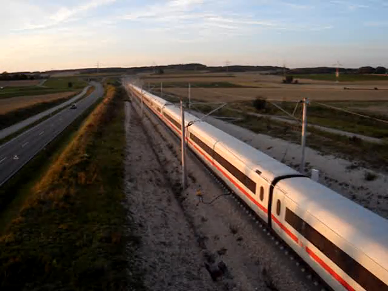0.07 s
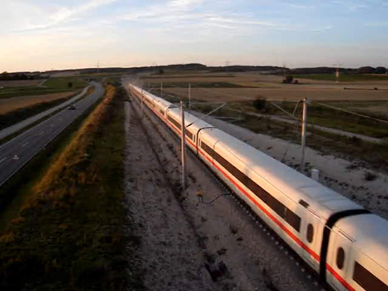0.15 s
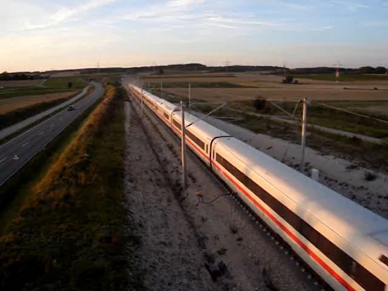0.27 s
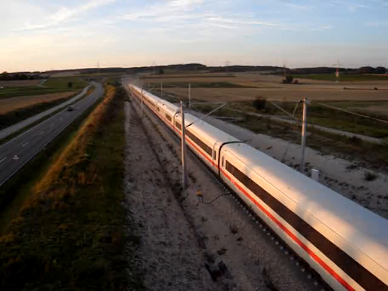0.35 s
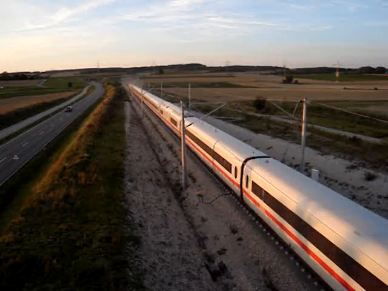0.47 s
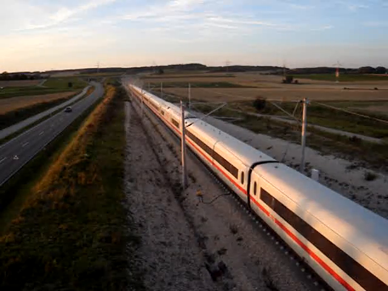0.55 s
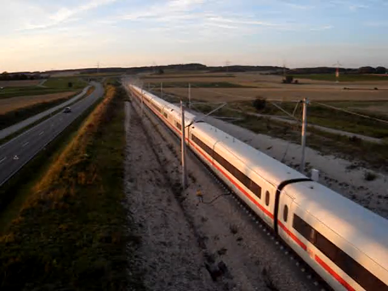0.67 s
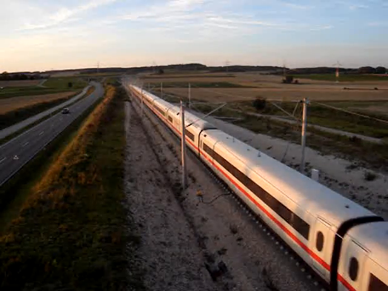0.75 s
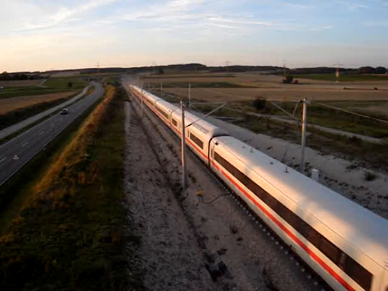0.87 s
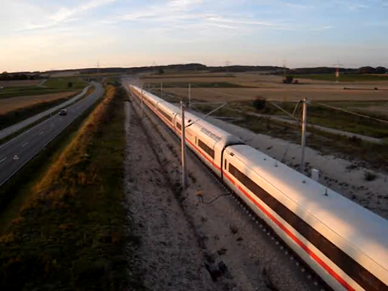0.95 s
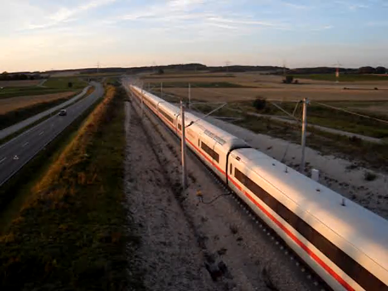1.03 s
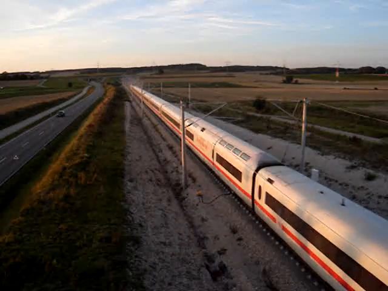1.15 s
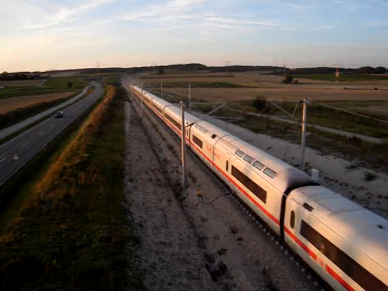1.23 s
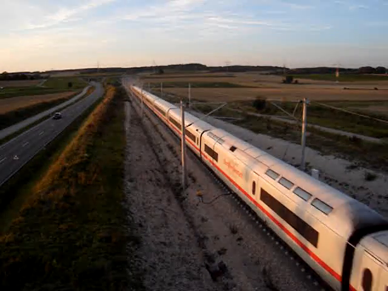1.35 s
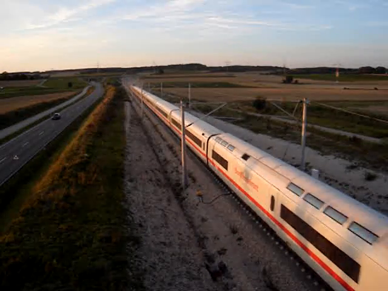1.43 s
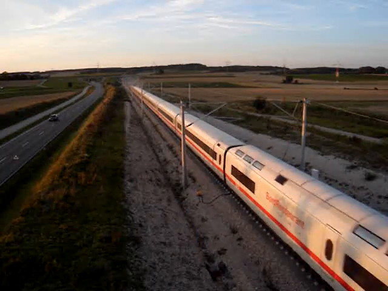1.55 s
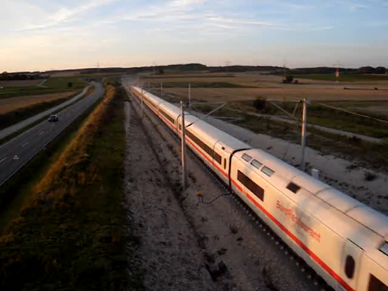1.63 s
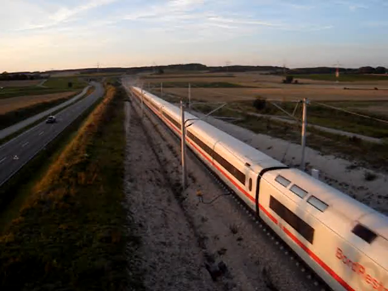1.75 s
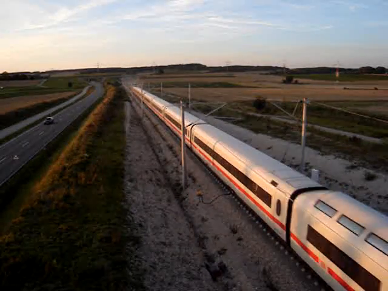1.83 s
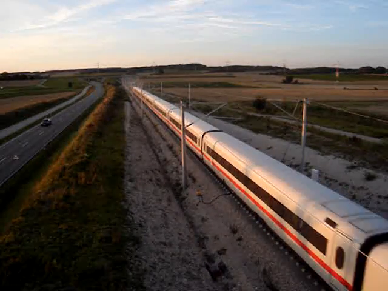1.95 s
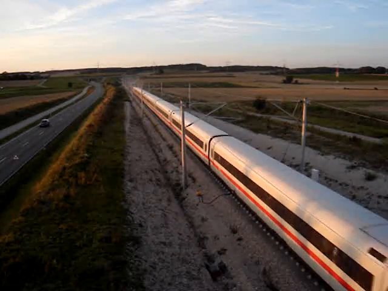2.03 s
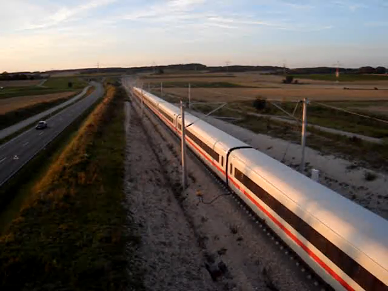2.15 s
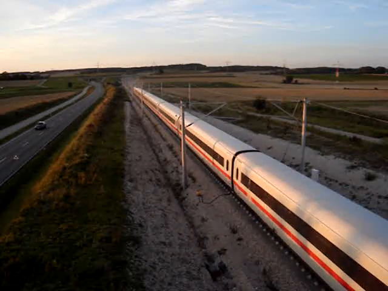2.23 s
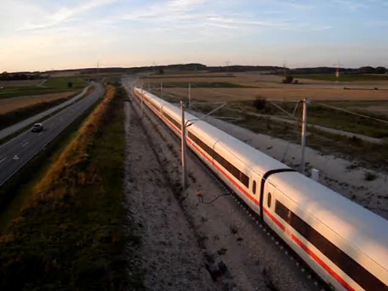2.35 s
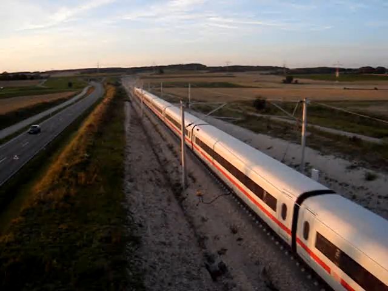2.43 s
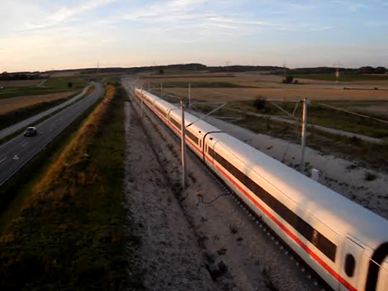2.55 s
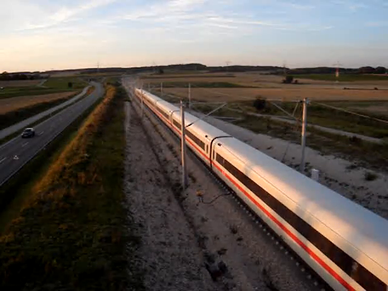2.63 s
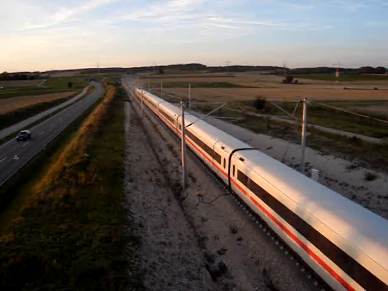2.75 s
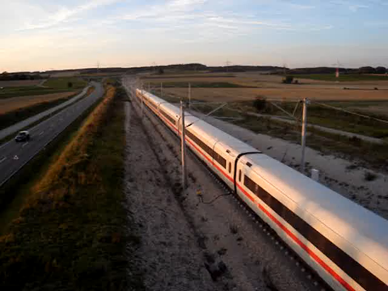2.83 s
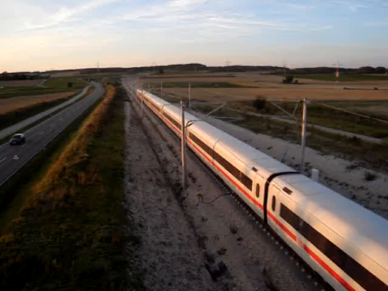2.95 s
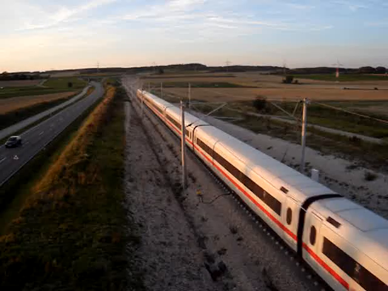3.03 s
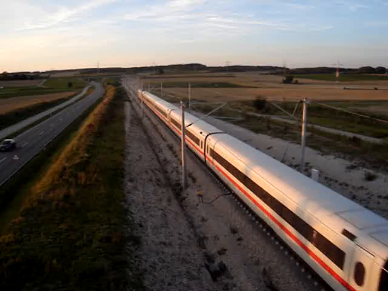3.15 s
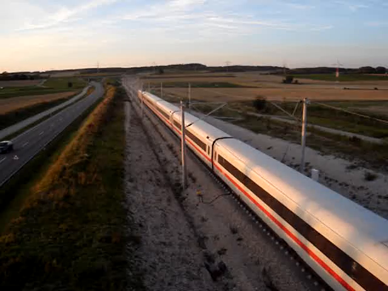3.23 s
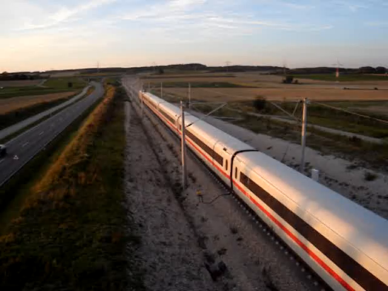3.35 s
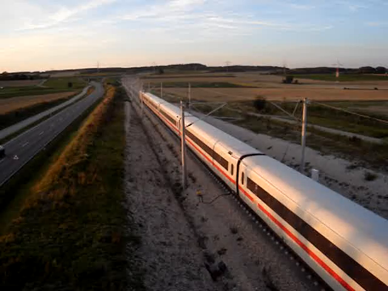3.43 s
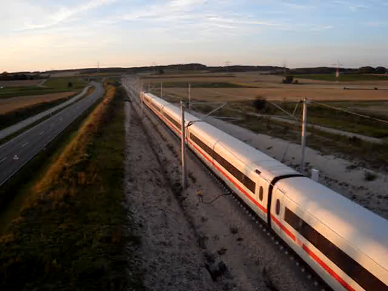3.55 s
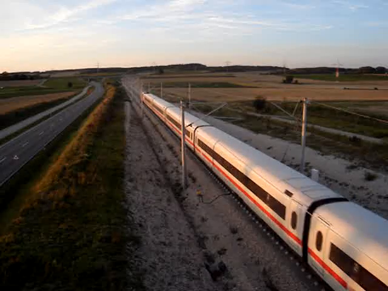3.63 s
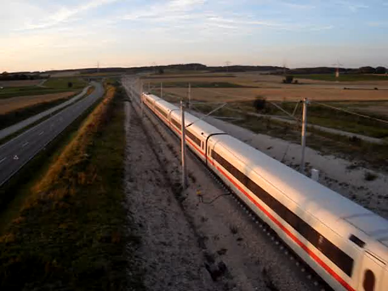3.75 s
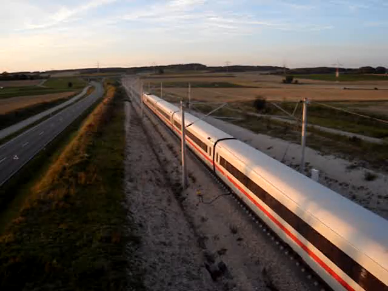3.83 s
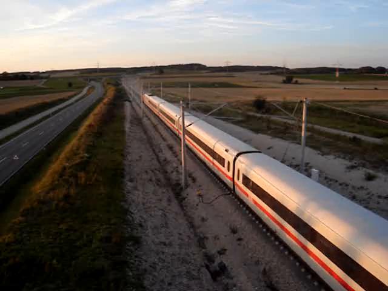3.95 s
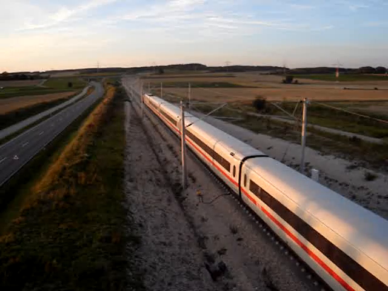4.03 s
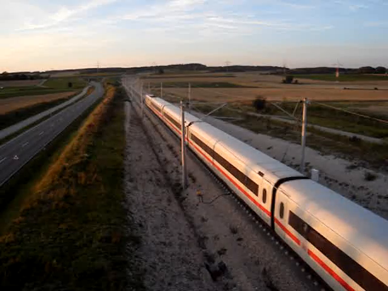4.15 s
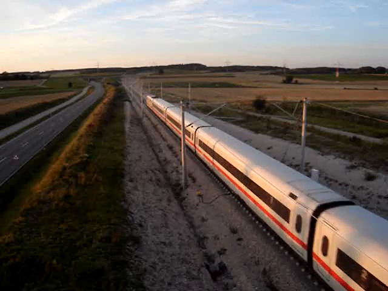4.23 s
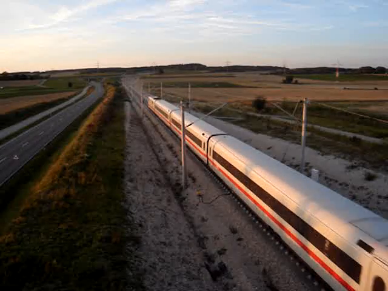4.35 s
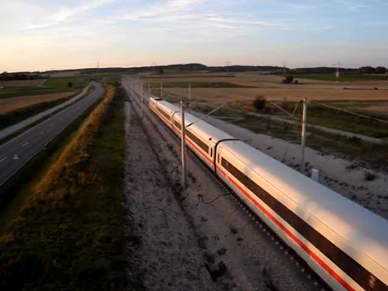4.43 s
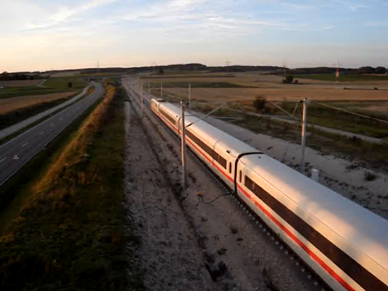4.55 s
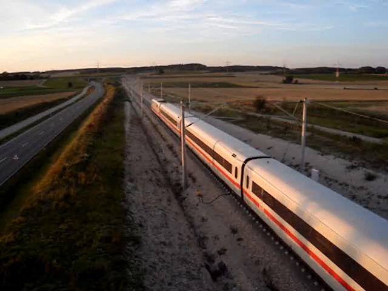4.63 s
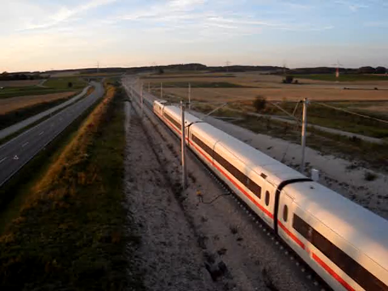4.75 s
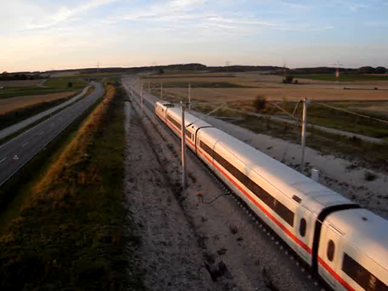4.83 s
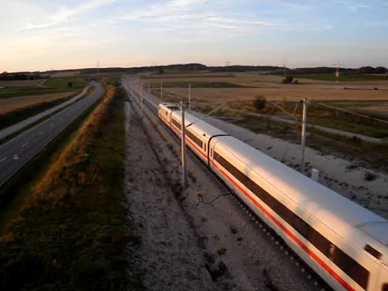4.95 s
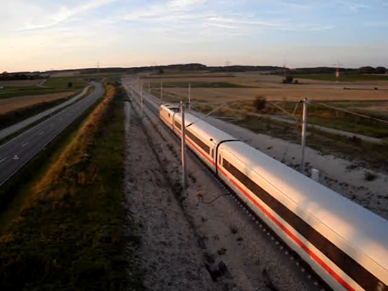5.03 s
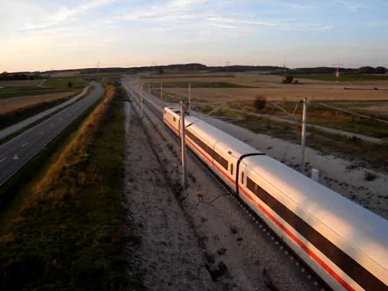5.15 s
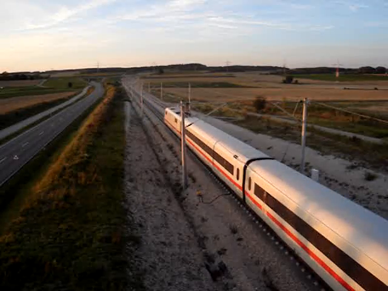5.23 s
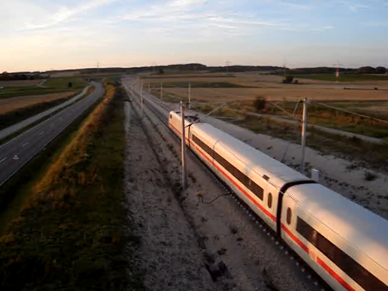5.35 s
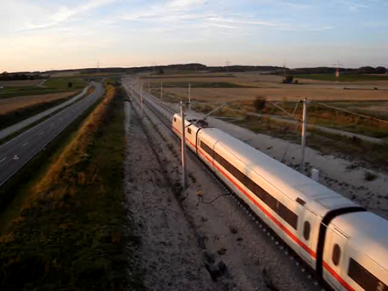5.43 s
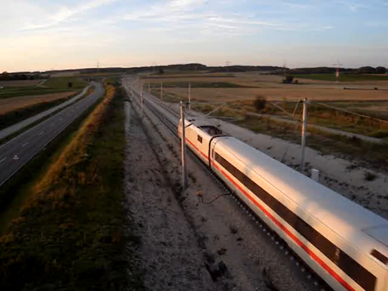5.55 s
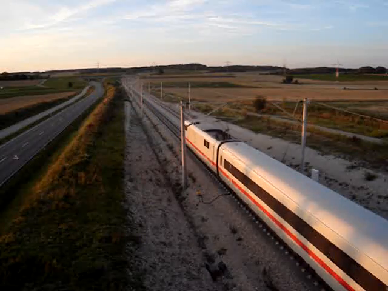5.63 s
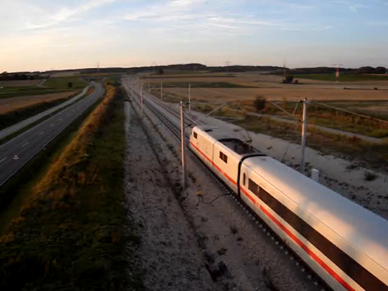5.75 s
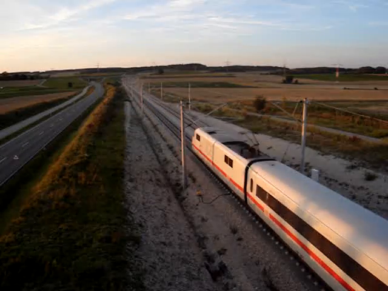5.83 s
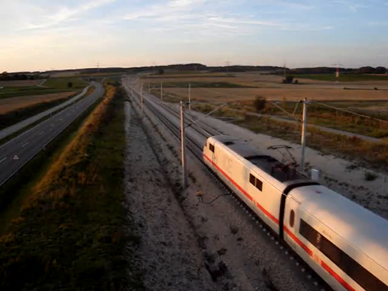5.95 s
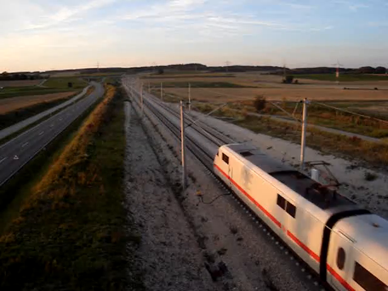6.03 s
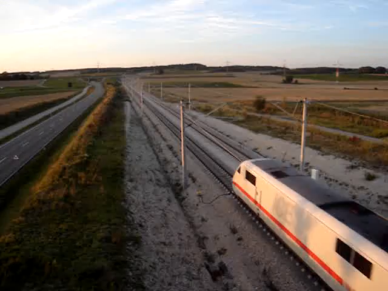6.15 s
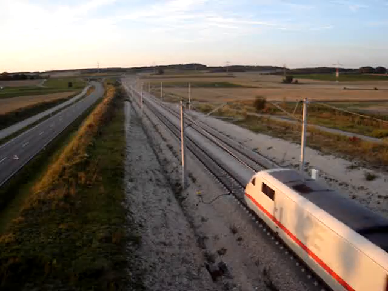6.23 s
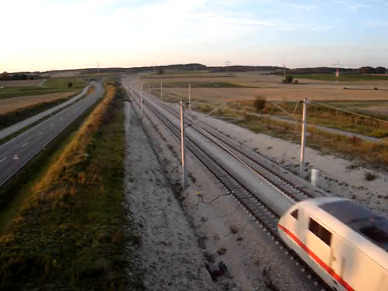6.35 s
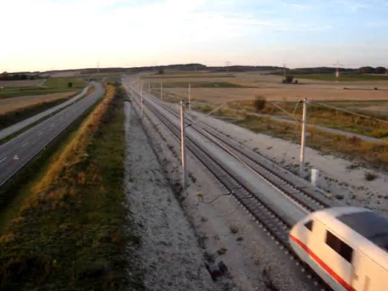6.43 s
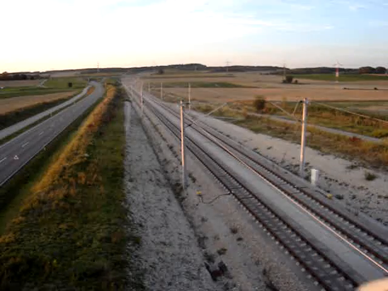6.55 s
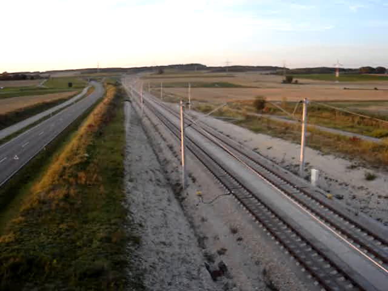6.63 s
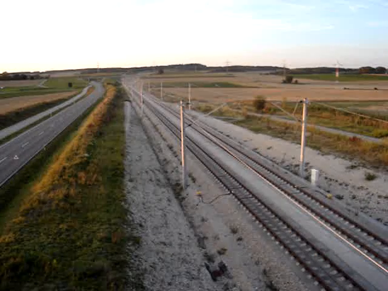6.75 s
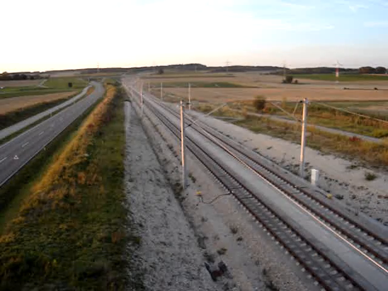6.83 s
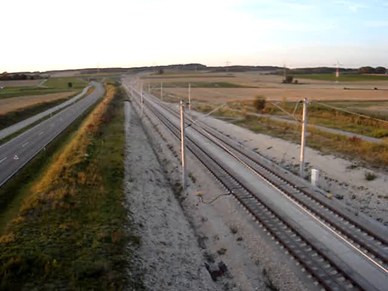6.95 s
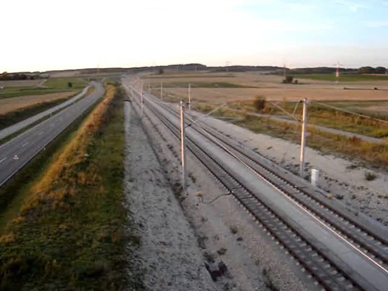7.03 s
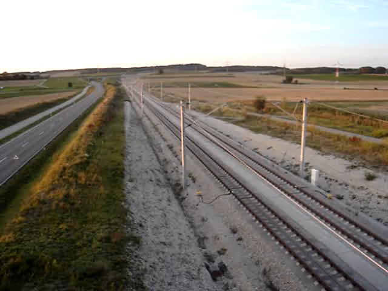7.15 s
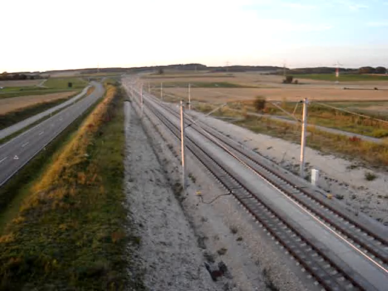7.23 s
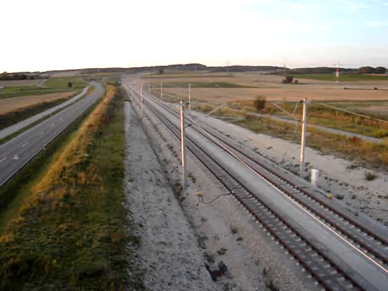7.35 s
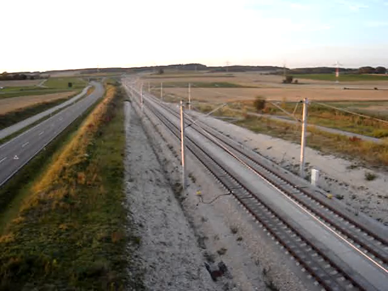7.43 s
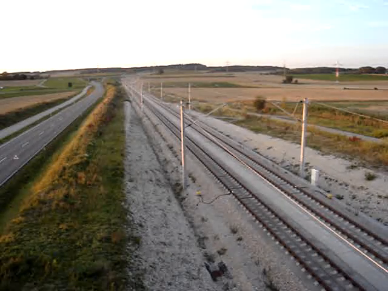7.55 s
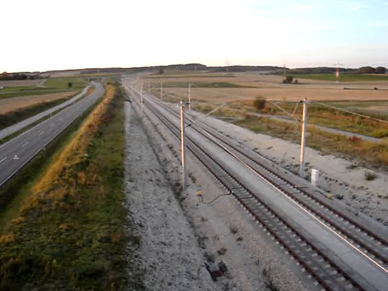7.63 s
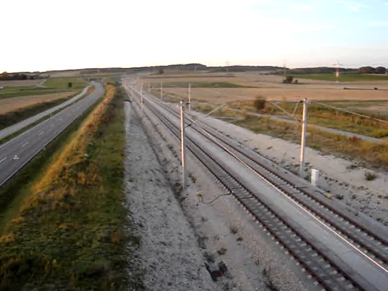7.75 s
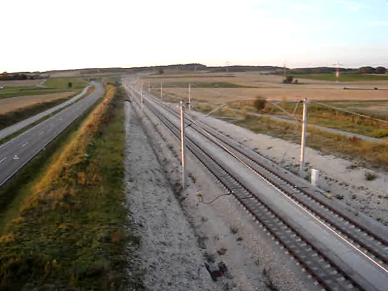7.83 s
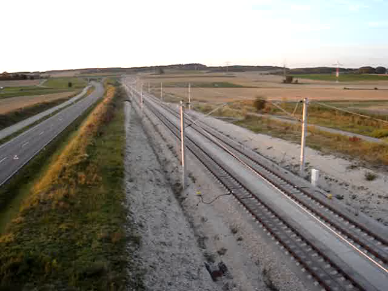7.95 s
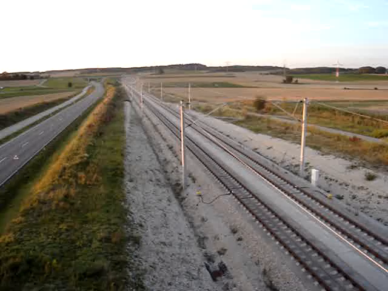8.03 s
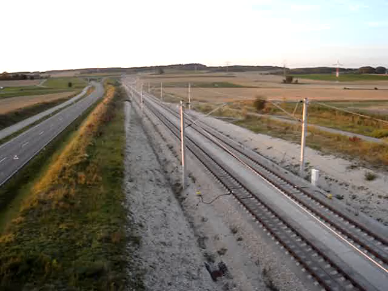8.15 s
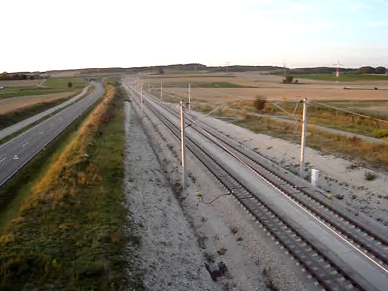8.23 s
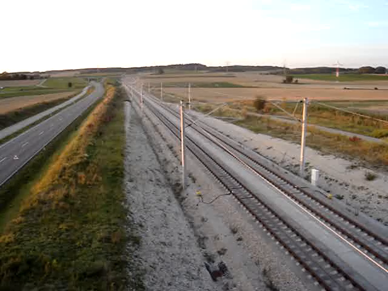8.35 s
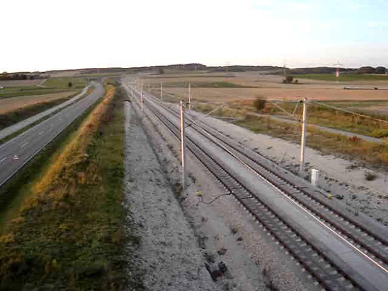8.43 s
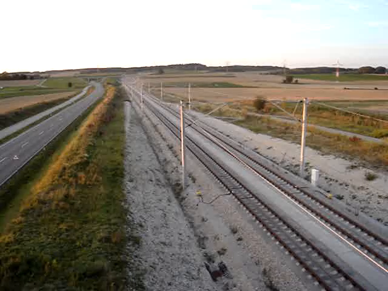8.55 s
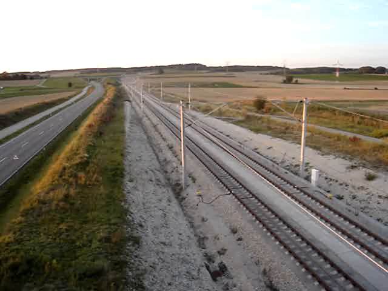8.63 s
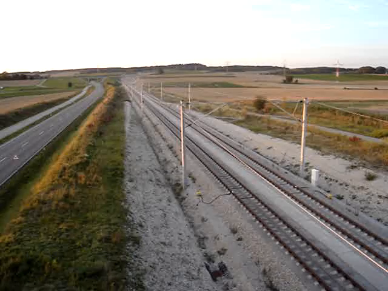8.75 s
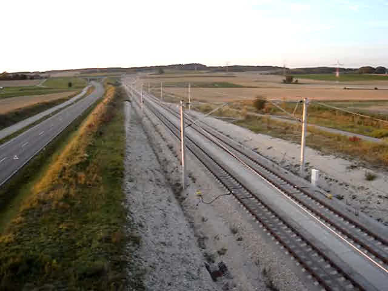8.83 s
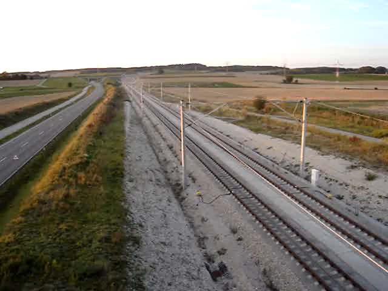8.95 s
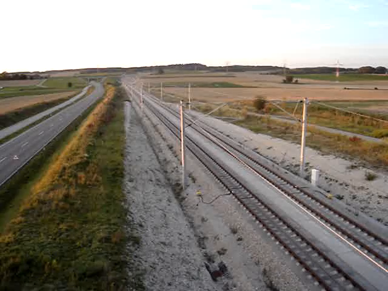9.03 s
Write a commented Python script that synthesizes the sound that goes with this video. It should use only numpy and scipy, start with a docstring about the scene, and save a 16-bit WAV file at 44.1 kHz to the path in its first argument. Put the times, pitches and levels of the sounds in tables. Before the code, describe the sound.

A high-speed train rushes past close by with pulsing wheel roar, hiss and brief squeals, then drops abruptly to a distant rumble.

```python
"""In open country, a high-speed train runs past below an embankment, slowing slightly.
Its rolling wheels make the rails roar and sing, on notes that sink with the speed. Each bogie (a frame
of wheels) rings and hisses, dropping in pitch as it passes (the Doppler effect), and slipping wheels
squeal. Fans drone in the rear power car, and air hoots off the pantograph, the arm on its roof.
Once the rear has gone by, the rush collapses to a dull, distant rumble."""
import sys
import numpy as np
from scipy import signal
from scipy.fft import rfft, irfft, next_fast_len
from scipy.io import wavfile

SR = 44100
rng = np.random.default_rng(int(sys.argv[2]) if len(sys.argv) > 2 else 0)


def generate_wav(sig):
    """Save sig (samples, or channels by samples) to the path in sys.argv[1] as 16-bit PCM at SR."""
    pcm = np.round(np.clip(np.atleast_2d(sig).T, -1, 1) * 32767).astype(np.int16)
    wavfile.write(sys.argv[1], SR, pcm)


N = 400869
T = np.arange(N) / SR

# The slowing train. Each row: time in seconds, speed in metres per second.
SPEED = [(0, 46.0), (1.3, 45.8), (3.2, 45.35), (4.8, 44.95), (7.0, 44.4), (9.09, 43.95)]
# The tone colour of each noise. Each row: frequency in Hz, relative level in dB.
AIR_COLOUR = [(20, -14.5), (45, -10), (70, -9), (120, -4), (200, -2), (280, 2.5), (400, 4.5), (520, -2.5),
              (800, -25.5)]
ROAR_COLOUR = [(260, -28.5), (350, -19), (450, -9), (580, -5), (720, -3), (830, -1.5), (900, -6.5),
               (1030, 2.5), (1120, -4), (1260, -7.5), (1450, -16), (2000, -38)]
WHEEL_COLOUR = [(1000, -15), (1350, -9), (1650, -3), (1800, 1.5), (1980, 0.5), (2150, -2), (2400, -5),
                (2850, -3.5), (3300, -9), (3800, -10.5), (4350, -11.5), (4650, -11), (5300, -11.5),
                (6500, -38.5)]
HISS_COLOUR = [(3000, -26), (3900, -10.5), (4350, -17), (4650, -3), (5100, -1.5), (5600, 2), (6200, 0.5),
               (6800, -4.5), (7400, -8), (8000, -12.5), (9200, -21.5), (9700, -21.5), (10200, -42)]
FAR_RUMBLE_COLOUR = [(20, -16), (60, -25), (120, -16.5), (210, -11.5), (260, -11.5), (400, -3), (520, -1),
                     (640, -0.5), (800, 2.5), (1120, -4), (1450, -5.5), (1850, -3.5), (2200, -11.5),
                     (3400, -18.5), (6000, -42)]
FAR_HISS_COLOUR = [(2000, -21), (3100, -6), (4200, 2.5), (5600, 2.5), (6700, -2.5), (7800, -8.5),
                   (8400, -8.5), (8800, -5.5), (9150, -18), (9550, -22), (9720, -11), (10000, -16)]
WAKE_COLOUR = [(20, -7), (45, -4), (90, 3), (130, 2), (200, -5), (400, -25)]
# How sounds grow and fade. Each row: time in seconds, relative level in dB.
AIR_LEVELS = [(0, -43.5), (1.0, -43.5), (1.8, -40), (2.6, -43), (4.0, -40.5), (4.8, -44.5), (5.9, -41),
              (6.4, -38.5), (7.1, -45)]  # air dragged along by the train
FAR_DRONE_LEVELS = [(0, -30), (2.8, -3.5), (3.5, 5.5), (4.8, 1.5), (6.2, 0), (7.7, -2), (8.35, 3),
                    (9.09, 2.5)]  # the power car from afar
FAR_RUMBLE_LEVELS = [(6.9, -27), (7.1, -29), (7.35, -28.5), (7.7, -30), (8.0, -28.5), (8.3, -29.5),
                     (8.55, -29), (8.8, -29.5), (9.09, -29)]
FAR_HISS_LEVELS = [(6.9, -37.5), (7.15, -42), (7.6, -43), (8.1, -45), (8.65, -47.5), (8.92, -45.5),
                   (9.09, -49)]
WAKE_LEVELS = [(7.0, -56), (7.9, -59), (8.3, -50), (8.6, -51), (9.09, -53)]  # swirling air behind the train
# Groups of bogies; rougher wheels are louder. Each row: passing time in seconds, then relative
# levels in dB for the wheels, hiss, rail roar, lower rail note and upper rail note.
BOGIES = [(.08, -2, 0.5, -23, -16.5, -18.5), (.67, 0.5, -0.5, -25, -20, -19),
          (1.24, 0.5, -.7, -24.2, -18.5, -19), (1.83, -0.5, -0.2, -23, -20, -20),
          (2.44, -2.5, -1, -21.5, -21.5, -20.5), (2.99, -1, -1.7, -22, -18, -21.5),
          (3.57, -7.5, -4.2, -21, -17.5, -19), (4.11, 0, -2, -22, -17.5, -21.5),
          (4.72, 1, -0.7, -22.5, -19.5, -20), (5.35, -1, -0.8, -24, -21, -17),
          (5.92, 3, 0.3, -22, -21.5, -20), (6.62, -2.5, 2, -21.5, -29, -18),
          (6.95, -14, -2.5, -23.5, -18, -21.5)]
# Notes from ripples on the rails: lower, upper, octave. Each row: pitch in Hz at the starting speed,
# width in Hz, relative level in dB beside the train, and the same once it has gone.
RAIL_NOTES = [(889, 10, -5, -2), (964, 24, -3, -1.5), (1910, 17, -5, -16.5)]
# The notes a wheel rings at. Each row: pitch at rest in Hz, width in Hz, relative level in dB
# close by, and the same far away.
WHEEL_NOTES = [(837, 13, -40, -45), (898, 11, -47, -43), (1810, 7.6, -37, -41.5), (1850, 16, -33, -65.5),
               (2710, 11, -40.5, -50.5), (2785, 15, -46, -82), (2960, 14, -53.5, -53)]
# Kinds of squeal; narrow ones ring, wide ones scrape. Each name: pitch in Hz, width in Hz,
# swell length in seconds.
SQUEAL_KINDS = {"ring": (1995, 40, 0.068), "low squeal": (2645, 18, 0.13), "squeal": (2990, 32, .11),
                "rasp": (4700, 120, .12), "zing": (5690, 110, 0.046), "scrape": (6120, 560, 0.2)}
# Brief wheel slips, and short flashes of the rail's high zing. Each row: loudest moment in seconds, kind of
# squeal, level in dB.
SQUEALS = [(0.995, "zing", -27.5), (1.351, "scrape", -31.5), (2.053, "ring", -26), (2.11, "scrape", -31.5),
           (2.324, "rasp", -32), (2.844, "rasp", -32), (3.349, "zing", -29.5), (3.82, "scrape", -35),
           (4.378, "squeal", -28.5), (4.7, "zing", -25.5), (4.92, "scrape", -31.5), (5.145, "zing", -24.5),
           (5.33, "low squeal", -32.5), (6.048, "squeal", -30.5), (6.1, "scrape", -30.5),
           (6.261, "ring", -22.5), (6.81, "low squeal", -33.5)]
# Fans and gears of the rear power car. Each row: passing time in seconds, pitch at rest in Hz,
# width in Hz, relative level in dB close by, and the same far away.
POWER_CAR_NOTES = [(6.71, 343, 22, -27.5, -42.5), (6.66, 405, 48, -31, -54), (6.1, 490, 37, -37.5, -60.5),
                   (6.68, 692, 18, -43.5, -40.5), (7.4, 865, 22, -41.5, -42.5), (6, 1956, 18, -47, -44.5)]
# The hoot of the roof arm. In order: passing time, how early it peaks and swell length, all in
# seconds, then pitch at rest in Hz, width in Hz, level in dB.
PANTOGRAPH_HOOT = (6.5, 0.3, 0.2, 159.5, 13, -42.5)
# A howl far down the line. In order: loudest moment in seconds, swell length in seconds, boost in dB.
FAR_HOWL = (8.78, 0.39, 6.7)

# Sounds peak just before a bogie passes. Each pair: seconds early, swell length in seconds.
ROAR_SWELL, WHEEL_SWELL, HISS_SWELL = (0.25, 0.42), (0.21, 0.57), (0.32, 0.45)
LOWER_SWELL, UPPER_SWELL, OCTAVE_SWELL = (0.11, 0.42), (0.19, 0.4), (0.3, 0.36)
TRACK_DISTANCE_M, SOUND_M_PER_S = 13.0, 343
REAR_GONE_S, HANDOVER_S = 6.84, 0.08


def from_db(db):
    """Turn decibels into a number to multiply by."""
    return 10 ** (np.asarray(db) / 20)


def unit_power(x):
    """Scale a signal to an average power of 1."""
    return x / np.sqrt(np.mean(np.abs(x) ** 2) + 1e-20)


def curve(rows):
    """Join a table's points with straight lines, one value a sample."""
    return np.interp(T, *np.transpose(rows))


def swell(peak_s, length_s, t=T):
    """A smooth rise and fall, down to about a third at length_s from its peak."""
    return np.exp(-((t - peak_s) / length_s) ** 2)


def bogie_swells(times, levels_db, shape):
    """One swell for each passing bogie, with their powers added."""
    early_s, length_s = shape
    t = T[::64]
    power = sum((from_db(db) * swell(s - early_s, length_s, t)) ** 2 for s, db in zip(times, levels_db))
    return np.interp(T, t, np.sqrt(power))


def coloured_noise(colour):
    """Noise shaped to the given tone colour."""
    size = next_fast_len(N)
    hz, db = np.transpose(colour)
    log_hz = np.log(np.maximum(np.fft.rfftfreq(size, 1 / SR), 1))
    gain = from_db(np.interp(log_hz, np.log(hz), db, left=-80, right=-80))
    spectrum = rfft(rng.standard_normal(size)) * gain
    return unit_power(irfft(spectrum, size)[:N])


def sing(hz, width_hz, t=T, size=16384):
    """A randomly shaken note that follows a pitch curve; the wider it is, the noisier it sounds."""
    flutter_hz = np.fft.fftfreq(size, 1 / 1000)  # one value a millisecond
    white = rng.standard_normal(size) + 1j * rng.standard_normal(size)
    flutter = unit_power(np.fft.ifft(white / (1 + (flutter_hz / width_hz) ** 2)))
    flutter = np.interp(t, np.arange(size) / 1000, flutter)
    phase = 2 * np.pi * np.cumsum(hz) / SR
    return unit_power(flutter.real * np.cos(phase) + flutter.imag * np.sin(phase))


def flicker(depth_db, rate_hz):
    """A gain that wanders up and down at random."""
    return from_db(depth_db * sing(np.zeros(N), rate_hz))


def fly_by(passing_s, speed, t=T):
    """The Doppler pitch factor and nearness (1 when closest) of a point on the train."""
    along = speed * (t - passing_s)
    distance = np.hypot(along, TRACK_DISTANCE_M)
    doppler = 1 / (1 + speed / SOUND_M_PER_S * along / distance)
    return doppler, TRACK_DISTANCE_M / distance


def rush():
    """Dragged air rushes, while rail roar, wheel noise and hiss swell with every bogie."""
    times, wheel_db, hiss_db, roar_db, _, _ = np.transpose(BOGIES)
    uneven_rail = flicker(depth_db=0.73, rate_hz=9.6)
    layers = [(from_db(curve(AIR_LEVELS) + 2), AIR_COLOUR),
              (bogie_swells(times, roar_db + 1, ROAR_SWELL), ROAR_COLOUR),
              (bogie_swells(times, 0.23 * wheel_db - 23.5, WHEEL_SWELL), WHEEL_COLOUR),
              (bogie_swells(times, hiss_db - 29.5, HISS_SWELL) * uneven_rail, HISS_COLOUR)]
    # swirling air shakes each layer a little
    return sum(gain * flicker(depth_db=0.81, rate_hz=20) * coloured_noise(colour)
               for gain, colour in layers)


def rails(speed, gone, octave_fade_db_per_s=1.05, tail_fade_db_per_s=7, zing_hz=5660, zing_end_s=6.5):
    """Bogies set the rails singing. Rails stay put, so there is no Doppler: pitch follows speed."""
    pace = speed / speed[0]
    times, *_, lower_db, upper_db = np.transpose(BOGIES)
    drives = (bogie_swells(times, lower_db, LOWER_SWELL),
              bogie_swells(times, upper_db, UPPER_SWELL),
              bogie_swells(times, -21 - octave_fade_db_per_s * times, OCTAVE_SWELL))
    # the rails go on singing behind the train
    tail = gone * from_db(-28 - tail_fade_db_per_s * np.maximum(T - REAR_GONE_S, 0))
    notes = np.zeros(N)
    for drive, (hz, width, near_db, far_db) in zip(drives, RAIL_NOTES):
        gain = (1 - gone) * drive * from_db(near_db) + tail * from_db(far_db) * howl(hz)
        notes += gain * sing(hz * pace, width)
    # the high zing does not carry along the rail
    alongside = 0.5 - 0.5 * np.tanh((T - zing_end_s) / HANDOVER_S)
    zing_gain = from_db(-37) * flicker(depth_db=2, rate_hz=5.5) * alongside
    return notes + zing_gain * sing(zing_hz * pace, width_hz=45)


def wheels(speed, gone, early_s=0.4, beam_s=0.15, beam_db=10, behind_db=-14.5, hiss_hz=5400):
    """Each bogie rings and hisses as it sweeps by; far away, all ring at the lowest Doppler pitch."""
    close = np.zeros(N)
    for s, ring_db, hiss_db, *_ in BOGIES:
        heard = np.abs(T - s) < 1
        t = T[heard]
        doppler, near = fly_by(s, speed[heard], t)
        # wheels throw their sound forward, so it is weak behind them
        aim_db = beam_db * swell(s - early_s, beam_s, t) + behind_db * np.clip((t - s) / beam_s, 0, 1)
        gain = np.cos(np.pi / 2 * (t - s)) * near * from_db(aim_db)
        ring = sum(from_db(db) * sing(hz * doppler, width, t) for hz, width, db, _ in WHEEL_NOTES)
        hiss = from_db(hiss_db - 47) * sing(hiss_hz * doppler, width_hz=260, t=t)
        close[heard] += gain * (from_db(ring_db) * ring + hiss)
    leaving_doppler = 1 / (1 + speed / SOUND_M_PER_S)
    far = sum(from_db(db) * howl(hz) * sing(hz * leaving_doppler, width * 0.8)
              for hz, width, _, db in WHEEL_NOTES)
    return close * (1 - gone) + far * gone


def squeals(speed):
    """A wheel slips on the rail, or the rail zings, and feeds one note for a moment."""
    out = np.zeros(N)
    for s, kind, db in SQUEALS:
        hz, width, length_s = SQUEAL_KINDS[kind]
        heard = np.abs(T - s) < 0.5
        t = T[heard]
        # the zing comes from the rail and sinks with the speed
        pace = speed[heard] / speed[0] if kind == "zing" else np.ones(len(t))
        out[heard] += from_db(db) * swell(s, length_s, t) * sing(hz * pace, width, t)
    return out


def power_car(speed, gone, falloff=4):
    """Cooling fans and gears drone from afar, throw their sound sideways and drop in pitch as they pass."""
    out = np.zeros(N)
    drone_db = curve(FAR_DRONE_LEVELS)
    for s, hz, width, near_db, far_db in POWER_CAR_NOTES:
        doppler, near = fly_by(s, speed)
        gain = from_db(near_db) * near ** falloff * (1 - gone) + from_db(far_db + drone_db)
        out += gain * sing(hz * doppler, width)
    return out


def pantograph(speed):
    """Air swirls off the roof arm and throws a short, low hoot ahead of it."""
    s, early_s, length_s, hz, width, db = PANTOGRAPH_HOOT
    doppler, _ = fly_by(s, speed)
    return from_db(db) * swell(s - early_s, length_s) * sing(hz * doppler, width)


def far_rumble():
    """Distance leaves a dull rumble and little hiss, while the wake rolls along the embankment."""
    layers = [(FAR_RUMBLE_LEVELS, FAR_RUMBLE_COLOUR),
              (FAR_HISS_LEVELS, FAR_HISS_COLOUR),
              (WAKE_LEVELS, WAKE_COLOUR)]
    return sum(from_db(curve(levels)) * coloured_noise(colour) for levels, colour in layers)


def howl(hz, below_hz=1000):
    """A gain that swells the low rail and wheel notes into a howl far down the line."""
    s, length_s, db = FAR_HOWL
    return from_db(db * swell(s, length_s)) if hz < below_hz else 1


def scene():
    """The near rush hands over to the far rumble once the rear has gone by."""
    speed = curve(SPEED)
    gone = 0.5 + 0.5 * np.tanh((T - REAR_GONE_S) / HANDOVER_S)  # 0 beside the train, 1 behind it
    noise = np.sqrt(1 - gone) * rush() + np.sqrt(gone) * far_rumble()
    rolling = rails(speed, gone) + wheels(speed, gone) + squeals(speed)
    rear = power_car(speed, gone) + pantograph(speed)
    return (noise + rolling + rear)[None]


def record(dry, ceiling=0.95, cutoff_hz=10150):
    """Round the peaks slightly and cut the highest treble."""
    lowpass = signal.ellip(12, 0.1, 90, cutoff_hz, fs=SR, output="sos")
    return signal.sosfilt(lowpass, ceiling * np.tanh(dry / ceiling))


dry = scene()
out = record(dry)
generate_wav(out)
```